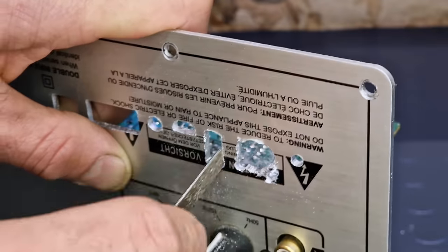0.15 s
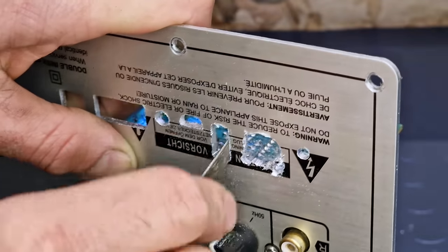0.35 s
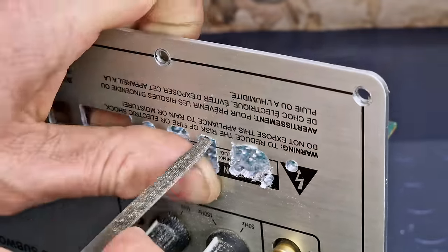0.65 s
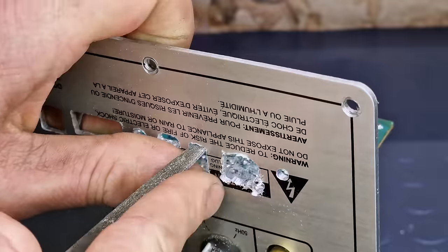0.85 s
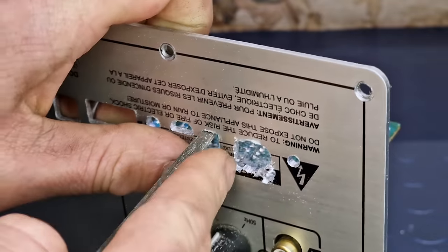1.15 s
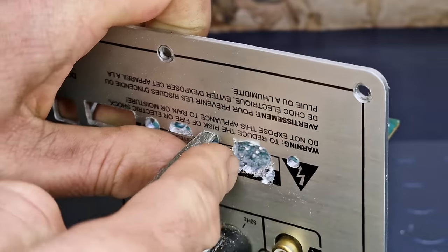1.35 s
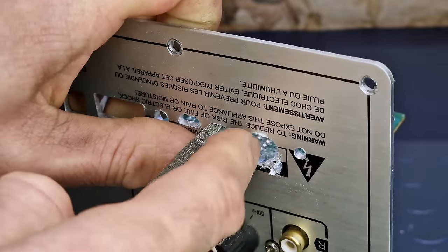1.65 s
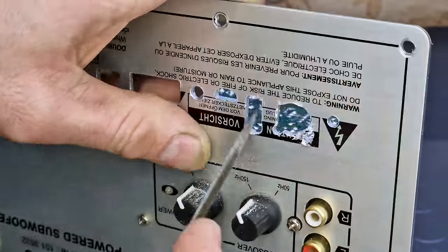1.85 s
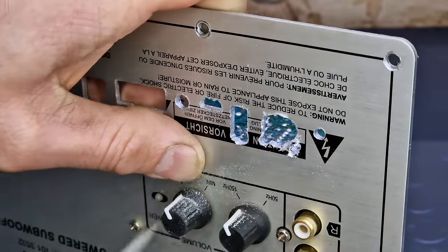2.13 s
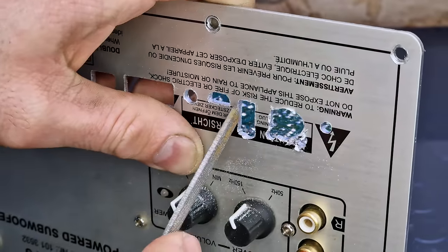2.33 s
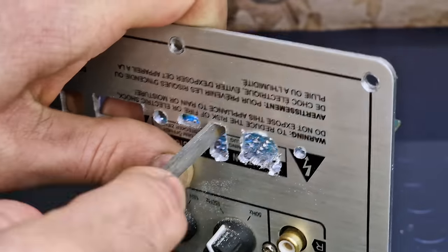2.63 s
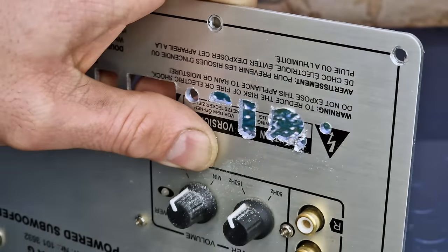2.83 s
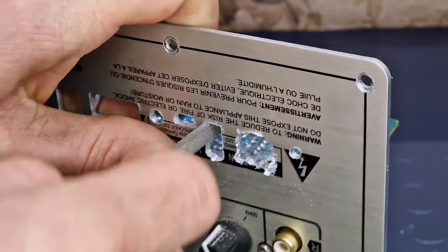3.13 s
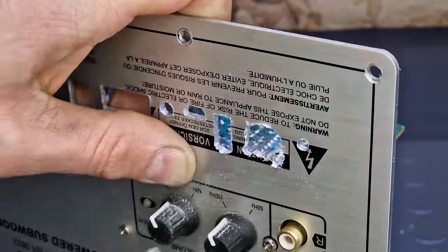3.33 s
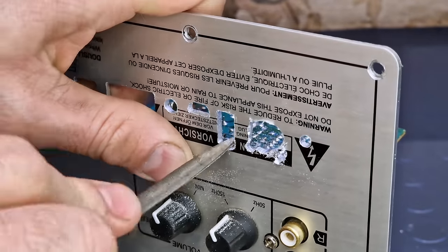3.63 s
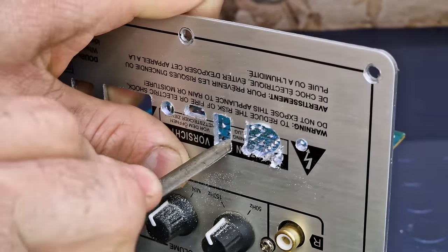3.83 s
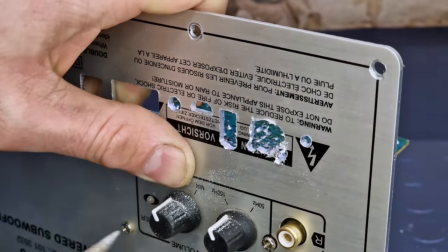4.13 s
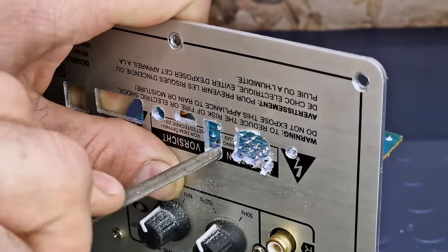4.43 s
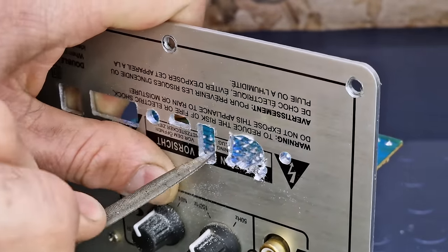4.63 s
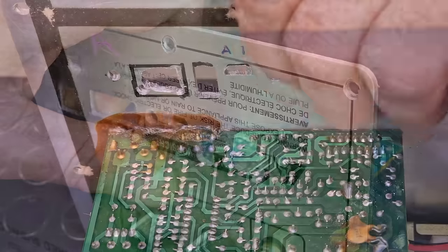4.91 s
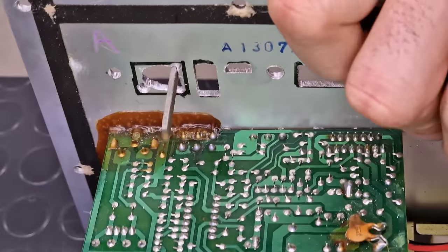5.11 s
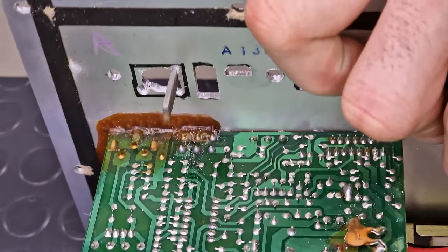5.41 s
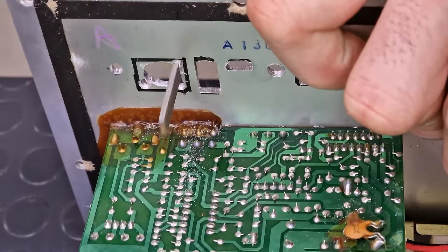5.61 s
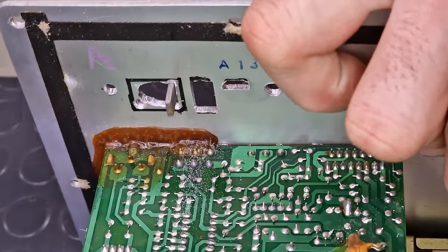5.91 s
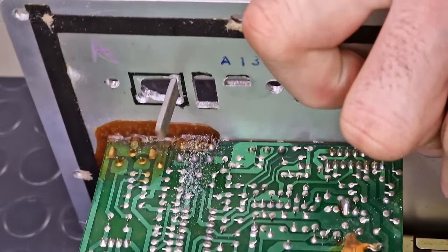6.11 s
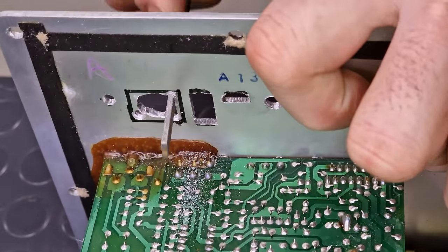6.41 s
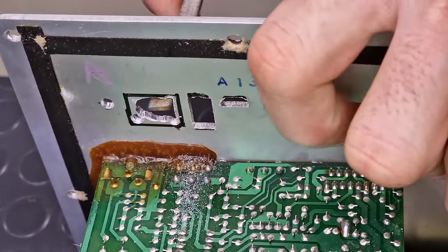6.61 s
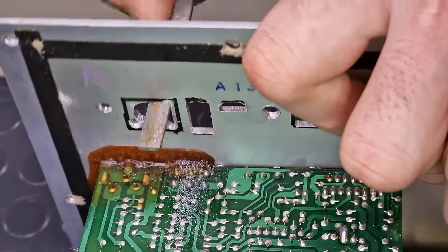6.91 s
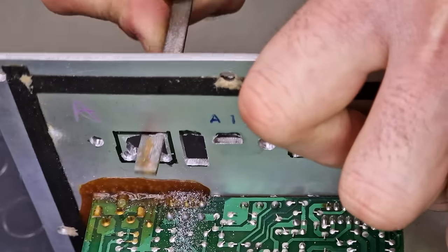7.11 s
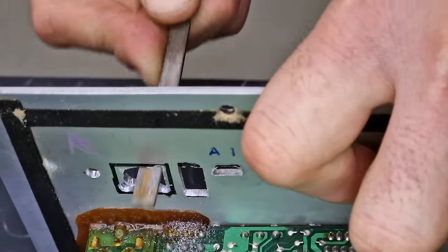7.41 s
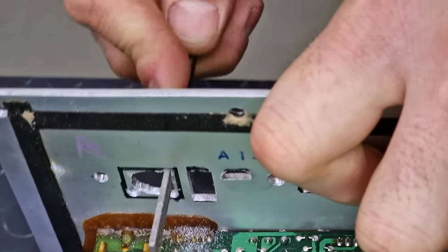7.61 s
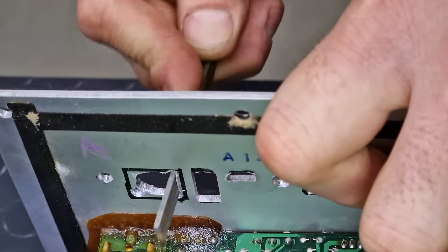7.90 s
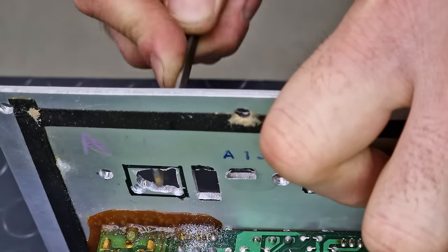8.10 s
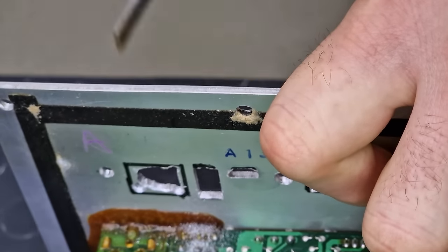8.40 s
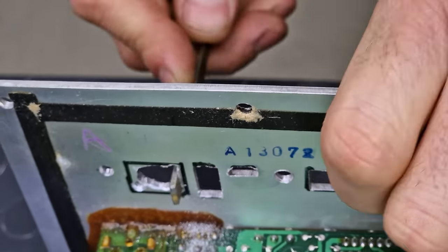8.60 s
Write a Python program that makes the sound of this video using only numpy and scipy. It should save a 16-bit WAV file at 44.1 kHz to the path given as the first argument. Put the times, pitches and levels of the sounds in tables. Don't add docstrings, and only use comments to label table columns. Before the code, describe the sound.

A close, dry stereo sound of a small steel file working a hole in a hand-held aluminium panel. From 0 to 0.45 s very fast strokes make a bright rasping buzz, about fifty per second. From 0.5 to 1.25 s there are separate crisp taps and scratches, then uneven groping strokes until 1.85 s. Tight bursts follow at 1.95-2.2, 2.5-2.85 and 3.05-3.4 s, separated by clicks and light scuffs. Softer rasping runs from 3.7 to 4.2 s, then isolated taps and jolts to 4.9 s. At about 5 s the panel is turned; filing is nearly continuous until 8.45 s, with short breaks, hollow rim knocks and brief damped metallic ringing. Three sharp taps around 8.55 s lead to faint ticks and a closing drag. Quiet workshop hum and a thin fan whine, slightly fainter after the turn, continue throughout.

```python
import sys
import numpy as np
from scipy import signal
from scipy.fft import rfft, irfft, next_fast_len
from scipy.io import wavfile
from scipy.ndimage import uniform_filter1d

SR = 44100
rng = np.random.default_rng(int(sys.argv[2]) if len(sys.argv) > 2 else 0)


def file_out(sig):
    cols = np.atleast_2d(sig).T
    lim = np.clip(cols, -1, 1)
    pcm = np.round(lim * 32767).astype(np.int16)
    wavfile.write(sys.argv[1], SR, pcm)


def elevation(decibels):
    levels = np.asarray(decibels, float)
    return 10 ** (levels / 20)


N = 385875
TIME_S = np.arange(N) / SR

TURN_S = 5.02
FILE_HZ, TEETH_HZ, BURR_HZ, FINEST_HZ = 2250, 4000, 8500, 12600
PULL_DB, SCATTER_DB, SCATTER_S = 2, 1.1, .0007
RIM_FRONT_DB, RIM_BACK_DB = -2.5, -4
RIM_FOLLOWS, BURR_YIELDS = 0.74, 0.14
PANEL_FOLLOWS, USUAL_DB = .85, -33
SPOT_DB, SPOT_S = 1.6, .02
CATCH_S, CATCH_DB = 0.00059, -12.5
SHAKE_DB, SHAKE_HZ = -43, 190
SHIFTING_DB = 1.1
STAYS_ON = 0.17
SWISH_S, SWISH_LENGTH_S, SWISH_DB = 4.975, .035, -59

# frequency [Hz], density [dB per Hz].
HUM = [(30, -10), (200, -8.5), (270, -6.5), (770, -10), (1200, -13), (3300, -15), (6000, -22.5),
       (15100, -20)]
# centre [Hz], width [Hz], level [dB].
WHINE = [(2385, 30, 0), (2600, 200, -8), (2780, 200, -10)]
# frequency [Hz], t60 [s].
SHOP = [(300, 0.27), (12000, 0.024)]
# first [s], last [s], strokes [count], first [dB], last [dB].
RUNS_FRONT = [(0.031, 0.113, 6, -34, -31), (0.128, 0.384, 18, -35, -30), (0.401, 0.441, 3, -33, -33),
              (1.952, 2.014, 4, -41, -32), (2.033, 2.106, 5, -32, -27), (2.122, 2.195, 5, -33, -24),
              (2.494, 2.755, 15, -31, -29), (2.773, 2.854, 7, -32, -30), (3.048, 3.136, 6, -31, -29),
              (3.151, 3.225, 7, -33, -29), (3.237, 3.317, 7, -31, -32), (3.334, 3.386, 4, -33, -30),
              (3.685, 3.75, 5, -40, -37), (3.781, 3.841, 5, -36, -40), (3.868, 3.92, 4, -35, -40),
              (3.936, 4.033, 8, -39, -32), (4.048, 4.162, 10, -32, -38)]
# first [s], last [s], strokes [count], first [dB], last [dB].
RUNS_BACK = [(5.084, 5.208, 7, -41, -27), (5.228, 5.32, 6, -30, -34), (5.332, 5.553, 16, -29, -29),
             (5.565, 5.693, 10, -27, -33), (5.713, 5.833, 8, -38, -36), (5.848, 5.948, 8, -33, -38),
             (5.976, 6.033, 4, -39, -32), (6.05, 6.244, 14, -30, -30), (6.26, 6.359, 7, -31, -32),
             (6.379, 6.45, 5, -38, -37), (6.469, 6.513, 3, -42, -36), (6.567, 6.635, 5, -35, -36),
             (6.723, 6.778, 4, -36, -27), (6.796, 6.891, 7, -28, -30), (6.913, 7.006, 7, -33, -33),
             (7.058, 7.211, 10, -32, -28), (7.222, 7.319, 6, -33, -33), (7.463, 7.512, 4, -43, -33),
             (7.613, 7.689, 6, -36, -33), (7.713, 7.762, 4, -36, -32), (7.789, 7.998, 15, -34, -36),
             (8.013, 8.079, 6, -36, -31), (8.194, 8.306, 9, -35, -32), (8.323, 8.454, 11, -33, -31)]
LEAN_FRONT = [-0.5, 2, -1, 5.5, 7, 2, 4.5, 3.5, 5, 3, 5.5, -1.5, 0, -4, -4, -4, -5]
LEAN_BACK = [2, 1, -3.5, 0, -1.5, 1.5, -1.5, -4.5, 1, -3.5, 5.5, -4, -1.5, 0, -0.5, -1.5, -0.5, 2, 3.5, 5,
             5, 6.5, 5, 9]
BITE_FRONT = [0, 0, 0, 0, 0, 0, 0, 0, 0, 0, 0, 0, 0, 0, 0, 0, 0]
BITE_BACK = [0, 0, 0, 0, 0, 0, 0, 0, 0, 0, 0, 0, 0, 0, 0, 0, 0, 0, 0, 0, 0, 0, -1, -1]
# peak [s], hiss [dB].
STROKES = [(.004, -33), (.741, -52), (.763, -34.5), (0.788, -46), (1.288, -40), (1.298, -36.5),
           (1.314, -51), (1.329, -37.5), (1.365, -40), (1.4, -39), (1.432, -35.5), (1.459, -42.5),
           (1.476, -52), (1.495, -38.5), (1.553, -39), (1.563, -32), (1.573, -38), (1.586, -38),
           (1.649, -36.5), (1.691, -42), (1.71, -40), (1.737, -36.5), (1.77, -36), (1.79, -37.5),
           (1.829, -32.5), (1.845, -40), (2.273, -35), (2.286, -31.5), (2.334, -47), (2.449, -44.5),
           (2.48, -35.5),
           (3.765, -55), (4.044, -43), (4.15, -34), (4.391, -42), (4.481, -47.5), (4.544, -34.5),
                (4.6, -36), (4.76, -33.5), (4.802, -36.5), (4.929, -37.5), (6.535, -38.5), (7.346, -26),
                (7.774, -40), (7.372, -36.5), (7.535, -30), (8.091, -28.5), (8.741, -41.5)]
# start [s], hiss [dB], t60 [s], weight on the panel [dB].
TAPS = [(0.502, -35, 0.019, -8), (0.5128, -29, 0.14, -5), (0.541, -22, 0.037, -18),
        (0.5714, -31, 0.026, -18), (0.639, -29.5, 0.01, 7), (0.6673, -40, 0.012, 2),
        (0.7365, -35, 0.019, 12), (0.759, -26.5, 0.022, -3), (0.8065, -28, 0.018, 0),
        (0.886, -56, 0.008, 7), (0.9465, -26, 0.014, -11), (1.0271, -21, 0.021, -10),
        (1.085, -21.5, 0.011, -13), (1.1614, -20.5, 0.021, -0.5), (1.2145, -25.5, 0.03, -6),
        (1.529, -28, 0.026, -5), (1.615, -30.5, 0.049, 5), (1.679, -28.5, 0.024, 3),
        (2.2575, -24.5, 0.025, 13), (2.4068, -28.5, 0.0078, -13), (3.4672, -28, 0.013, -8),
        (3.561, -35.5, 0.016, -15), (3.637, -40.5, 0.074, -5), (4.2722, -28.5, 0.003, -7.5),
        (4.3755, -30.5, 0.013, 2.5), (4.467, -30.5, 0.029, -9.5), (4.571, -24.5, 0.0059, 5),
        (4.785, -25.5, 0.0066, 1), (4.842, -35.5, 0.015, 1), (4.8732, -21.5, 0.02, 1)]
# start [s], hiss [dB], t60 [s], weight on the panel [dB].
TAPS_BACK = [
    (7.445, -49.5, 0.083, 5),
    (8.516, -27, 0.0099, -5),
    (8.5502, -25, 0.008, -1),
    (8.584, -27, 0.0095, 1),
]
# start [s], hiss [dB], t60 [s], weight on the panel [dB].
FURTHER_TAPS = [(0.777, -26, .01, -12), (.85, -50, .03, -8), (.905, -57, 0.0059, 9), (0.985, -35, .008, -8),
                (1.015, -53, 0.0051, -3), (1.061, -34, .008, -13), (1.139, -50, 0.0066, 9),
                (1.177, -37, 0.017, -1), (1.93, -51, 0.016, -3), (2.277, -25, 0.0099, 12),
                (2.298, -36.5, 0.085, -8), (2.327, -37, .008, 1), (2.43, -46, .01, -9), (3.458, -44, .01, 4),
                (3.479, -39, .03, -5), (3.486, -43, 0.017, 8), (3.491, -41.5, .06, -3), (3.529, -43, .01, 11),
                (3.574, -49, 0.045, 7), (4.406, -34, .008, -11), (4.624, -31.5, 0.0079, -6),
                (6.644, -37.5, 0.07, -21), (8.573, -53, 0.0091, -4), (8.616, -40.5, 0.054, -9),
                (8.637, -46, 0.034, 13), (8.662, -33.5, 0.028, 3), (8.675, -46, 0.13, 8), (8.701, -44.5, 0.11, 6),
                (8.73, -42, 0.055, 6)]
# start [s], peak [dB].
CATCHES = [(0.762, -13), (1.028, -18), (1.681, -17), (1.772, -13), (1.829, -10), (2.2604, -14),
           (2.2764, -26), (2.283, -14), (2.3326, -36), (2.6035, -14), (2.7157, -15), (2.8392, -8.5),
           (3.7484, -35), (3.7788, -36), (3.99, -29), (4.0175, -18), (4.0438, -13), (4.07, -24),
           (4.0984, -15), (4.147, -13), (4.5446, -32), (4.7591, -13), (4.877, -18), (5.59, -16),
           (6.1065, -14), (7.345, -13), (7.761, -21), (8.086, -5), (8.289, -13), (8.5158, -11.5),
           (8.5507, -15)]
# start [s], length [s], level [dB].
SCUFFS = [
    (0.59, 0.14, -62.5),
    (0.951, 0.056, -56.5),
    (2.262, 0.08, -51),
    (2.333, 0.044, -56),
    (3.46, 0.13, -64),
    (4.275, 0.052, -71),
    (5.06, 0.2, -60),
    (5.028, 0.065, -66),
    (6.665, 0.042, -60),
    (8.646, 0.34, -59.5),
]
# start [s], peak [dB].
HOLE_KNOCKS = [(.7625, -26.5), (.9465, -31), (1.0278, -27), (1.1635, -35), (1.2145, -39), (1.293, -26),
               (1.6815, -31), (1.8295, -35), (2.2615, -24.5), (3.487, -39), (3.4925, -48), (2.285, -31),
               (4.545, -35), (4.76, -40), (4.8765, -42),
               (5.0778, -26), (5.174, -13.5), (5.2155, -13.5), (5.246, -21), (5.2793, -14.5), (5.3412, -14),
          (5.3731, -16), (5.399, -20.5), (5.5642, -30), (5.629, -21), (5.6909, -12.5), (5.7222, -19.5),
          (5.7487, -19.5), (5.7911, -28), (5.8365, -20), (6.0251, -24.5), (6.063, -35), (6.1059, -23.5),
          (6.1299, -16.5), (6.2691, -13.5), (6.3214, -25), (6.3374, -20), (6.3582, -21), (6.398, -29),
          (6.4916, -26), (6.512, -18), (6.7195, -38), (6.7435, -28), (6.8892, -17), (6.9844, -15.5),
          (7.0573, -42), (7.1252, -22), (7.155, -23.5), (7.178, -25), (7.3353, -24), (7.3511, -11),
          (7.5197, -26), (7.5381, -15), (7.615, -16.5), (7.704, -18), (7.76, -23.5), (7.849, -23.5),
          (7.8739, -15.5), (8.0141, -20), (8.048, -22), (8.064, -24), (8.0929, -20), (8.1922, -52),
          (8.2354, -30), (8.2461, -21), (8.2794, -22.5), (8.3094, -22.5), (8.321, -21.5), (8.3473, -21.5),
          (8.3763, -24), (8.3923, -18), (8.4306, -35), (8.515, -30)]
# start [s], peak [dB].
SHOVES = [(1.165, -34), (4.377, -34.5), (4.88, -33), (4.546, -27.5), (4.596, -32), (4.76, -30),
          (5.149, -57), (8.291, -26), (8.319, -51), (8.349, -53)]
# start [s], peak [dB].
BUMPS = [
    (4.545, -68),
    (4.876, -66),
    (5.692, -55),
    (6.3, -66),
    (6.89, -56),
    (8.31, -66),
]
# start [s], frequency [Hz], level [dB].
RINGS = [
    (1.769, 4000, -17.5),
    (1.829, 1790, -22),
    (3.529, 920, -37),
    (6.32, 4000, -28),
]
# time [s], slack on the panel [dB], freedom of the file [dB].
GRIP = [(0.0, -0.5, -5.5), (0.62, -3, -10.5), (0.94, 4, -10.5), (1.56, 5.5, -10), (1.95, 0, 0),
        (2.22, -10.5, -18), (2.28, -8.5, -7), (2.45, -4, -10), (3.0, -7.5, -19.5), (3.44, -2, -10),
        (3.75, 3.5, -15), (4.38, 6.5, -10.5), (4.75, -2.5, -11.5), (5.06, 4.5, -18), (5.2, 8.5, -19),
        (5.62, 2.5, -19.5), (6.4, 4.5, -19), (7.6, 3.5, -17), (8.5, -2.5, -23.5)]
# time [s], share of the hiss [dB].
BURR = [(0, -1.23), (.6, -1.5), (1.2, 0), (1.85, -4.5), (2, -1.98), (3.4, -1.85), (3.7, -0.5), (4.2, -1),
        (5, -2), (5.1, 3.5), (5.6, 1.5), (5.85, 1), (6.15, 0.5), (6.5, 0), (7.2, 0), (7.8, -1), (8.4, -1),
        (8.7, -0.5)]
# time [s], finest hiss [dB].
TILT = [(0, 1), (.9, -1), (1.9, -2), (3.4, 0), (3.7, -7), (4.2, -5), (4.9, 1), (5.2, -4), (5.7, -3),
        (6.2, 0), (6.9, -2), (7.2, 3), (7.7, 0), (8.4, 2), (8.6, -6)]
# centre [Hz], width [Hz], level [dB].
PANEL_FRONT = [(285.7, 25.5, -14.5), (373, 26.6, -13), (435, 27, -13), (493.5, 11, -10.5),
               (538.3, 16.6, -8), (607.5, 23.3, -4), (668, 29, -7), (736.6, 21.6, -1), (854, 29, 1),
               (940.6, 24, -1.5), (973, 67, -7.5), (1059, 44, -5), (1130, 42, -5.5), (1237, 144, -13)]
# centre [Hz], width [Hz], level [dB].
PANEL_BACK = [(298, 27.4, -17), (379, 41, -20.5), (556, 27.6, -10.5), (596, 28.6, -9), (744, 21.5, 0),
              (858, 19, 3.5), (935, 25, -2.5), (961, 25, -6.5), (1084, 85, -4.5), (1142, 37, -1.5)]
# centre [Hz], width [Hz], level [dB].
RIM_FRONT = [(1370, 82, -0.5), (1482, 54, 4.5), (1578, 36, 4), (1694, 93, 0), (1780, 104, 2.5),
             (2028, 290, 0.5), (2182, 99, 2), (2290, 250, -1)]
# centre [Hz], width [Hz], level [dB].
RIM_BACK = [(1386, 74, 8.5), (1514, 31, 8.5), (1565, 120, 2), (1740, 45, 3), (1812, 48, 7.5),
            (1938, 48, 1.5), (2057, 68, 1), (2303, 44, -2), (2372, 43, -4), (2800, 22, -10.5)]
# centre [Hz], width [Hz], level [dB].
STRUCK = [(1409, 24.5, 4.5), (1837, 207, 5), (1950, 280, -1)]
# centre [Hz], width [Hz], level [dB].
ROCK = [(320, 130, 0)]
# frequency [Hz], density [dB per Hz].
HISS_FRONT = [(2200, 11.5), (2700, 14.5), (3400, 0), (4500, 3.5), (4900, 8), (5500, 7), (6000, -1.5),
              (7200, -4), (9500, -4), (10500, 3.5), (12200, 5), (13200, 3), (15500, 0)]
# frequency [Hz], density [dB per Hz].
HISS_BACK = [(2200, -2.5), (3000, -4.5), (4200, -0.5), (5450, 11), (6200, 5.5), (6700, 4.5), (8300, -11.5),
             (9600, -4), (11100, 0), (12150, 1), (12700, -3), (13400, -8), (14300, 0), (15500, -8.5)]
# frequency [Hz], lead [radians].
LEAD_FRONT = [(2500, 0.06), (6400, 0.76), (8600, 0.66), (13000, 1.76)]
# frequency [Hz], lead [radians].
LEAD_BACK = [(1500, -0.69), (6000, -0.15), (12000, -1.76), (15000, -2.1)]
# frequency [Hz], likeness [0 to 1].
ALIKE = [(80, .5), (250, .96), (600, .999), (1200, .996), (2000, .94), (5000, .81), (12000, .72)]


def unit(x):
    return x / np.sqrt(np.mean(np.abs(x) ** 2) + 1e-20)


def gaussian(*shape):
    return rng.standard_normal(shape)


def along(points, hz):
    f, v = np.transpose(points)
    return np.interp(np.log(hz + 1), np.log(f + 1), v)


def over_time(points, column=1):
    table = np.transpose(points)
    return np.interp(TIME_S, table[0], table[column])


def filtered(x, response):
    size = next_fast_len(N + SR // 8, True)
    return irfft(rfft(x, size) * response(np.fft.rfftfreq(size, 1 / SR)), size)[..., :N]


def modes(table):
    def response(f):
        total = 0
        for k, (centre, width, db) in enumerate(table):
            loss = 1j * f * width
            total = total + (-1) ** k * elevation(db) * loss / (centre * centre - f * f + loss)
        return unit(total)
    return response


def above(f, hz):
    return 1 - 1 / (1 + (f / hz) ** 16)


def behind():
    return (np.arange(N) > TURN_S * SR) * 1.


def patches(shape):
    return unit(uniform_filter1d(uniform_filter1d(gaussian(*shape), size=2, axis=0), size=4, axis=1))


def ports(pair, lead, alike):
    def mix(f):
        angle = np.arccos(np.clip(along(alike, f), 0, 1)) / 2
        return np.array([np.cos(angle), np.sin(angle)])
    mid, side = filtered(pair, mix)
    left_right = np.array([mid + side, mid - side])
    return filtered(left_right, lambda f: np.exp([[.5j], [-.5j]] * along(lead, f)))


def hum():
    noise = unit(filtered(gaussian(2, N), lambda f: elevation(along(HUM, f))))
    wobble_db = 2.1 * unit(uniform_filter1d(gaussian(N), size=1500))
    whine = elevation(-3.0 - 10 * behind() + wobble_db) * filtered(gaussian(2, N), modes(WHINE))
    drift_db = 0.56 * unit(uniform_filter1d(gaussian(N), size=3000))
    room = elevation(-64.0 - 2.6 * behind() + drift_db) * ports(noise + whine, LEAD_BACK, [(100, 0.49)])
    swell = np.exp(-((TIME_S - SWISH_S) / SWISH_LENGTH_S) ** 2)
    slide = swell * filtered(gaussian(N), modes([(2820, 390, 0)]))
    return room + elevation(SWISH_DB) * slide


def strokes():
    rows = []
    runs = zip(RUNS_FRONT + RUNS_BACK, BITE_FRONT + BITE_BACK, LEAN_FRONT + LEAN_BACK)
    for (first, last, count, first_db, last_db), bite_db, lean_db in runs:
        push_pull_db = PULL_DB * (.5 - np.arange(count) % 2)
        hiss_db = np.linspace(first_db, last_db, count) + bite_db + push_pull_db
        rows.append((np.linspace(first, last, count), hiss_db, np.full(count, lean_db - bite_db)))
    even = np.hstack(rows).T
    even[:, :2] += gaussian(len(even), 2) * [SCATTER_S, SCATTER_DB]
    single = np.pad(STROKES, ((0, 0), (0, 1)))
    every = np.vstack([even, single])
    return every[np.argsort(every[:, 0])]


def stroke_power():
    power, t = np.zeros((2, N + SR)), np.arange(SR // 10) / SR
    from_peak = t - t[-1] / 2
    light = elevation(-23.2 - 114 * np.maximum(from_peak / 0.087, -from_peak / 0.058))
    passes = strokes()
    gaps = np.diff(passes[:, 0], prepend=0, append=N / SR)
    lengths = np.clip(0.27 * np.minimum(gaps[1:], gaps[:-1]), .002, .0046)
    for (s, db, lean_db), length in zip(passes, lengths):
        swell = np.exp(-np.abs(from_peak / length) ** 4.2) + light
        gain = elevation([[2 * (db + 0.088)], [2 * (db + lean_db - 0.5)]])
        power[:, round(s * SR):][:, :len(t)] += gain * swell
    return power[:, len(t) // 2:][:, :N]


def tap_power():
    power, t = np.zeros((2, N + SR)), np.arange(SR // 10) / SR
    for s, db, t60, lean_db in TAPS + TAPS_BACK + FURTHER_TAPS:
        decay = elevation(2.4 - 120 * t / 0.0019) + elevation(-120 * t / t60) + elevation(-46.4 - 120 * t / 0.087)
        gain = elevation([[2 * (db - 0.5)], [2 * (db + lean_db + 0.5)]])
        power[:, round(s * SR):][:, :len(t)] += gain * (1 - np.exp(-t / 0.00084)) * decay
    return power[:, :N]


def drag():
    uneven = elevation(3.5 * unit(uniform_filter1d(gaussian(N), size=200)))
    force = np.zeros(N)
    for s, length, db in SCUFFS:
        fade = 2 * (s + length - TIME_S) / length
        force += elevation(db) * np.clip(np.minimum((TIME_S - s) / 0.0035, fade), 0, 1)
    return uneven * force


def catch_power():
    power, t = np.zeros((2, N + SR)), np.arange(SR // 10) / SR
    from_peak = t - t[-1] / 2 - CATCH_S
    for s, db in CATCHES:
        spike = np.exp(-(from_peak / CATCH_S) ** 2)
        power[0, round(s * SR):][:len(t)] += elevation(2 * (db + CATCH_DB)) * spike
    return power[:, len(t) // 2:][:, :N]


def pressure():
    return np.sqrt(stroke_power() + tap_power() + catch_power())


def grit(patchy_db):
    z = signal.stft(gaussian(2, N), nperseg=256)[2]
    gain = elevation(patchy_db * patches(z.shape[1:]))
    even_gain = gain / np.sqrt(np.mean(gain ** 2, axis=0))
    stream = signal.istft(z * even_gain, nperseg=256)[1][:, :N]
    harder_db = 2.25 * unit(uniform_filter1d(gaussian(N), size=20))
    return unit(stream * elevation(harder_db))


def favoured(x, patchy_db):
    z = signal.stft(x, nperseg=1024)[2]
    low = z[:, :80]
    low *= unit(elevation(patchy_db * patches(low.shape[1:])))
    return signal.istft(z, nperseg=1024)[1][:, :N]


def spots(count):
    knots = gaussian(count, int(N / SR / SPOT_S) + 2)
    return [unit(elevation(SPOT_DB * np.interp(TIME_S / SPOT_S, np.arange(len(k)), k))) for k in knots]


def blows(events, gain_db):
    push, shape = np.zeros((2, N)), np.hanning(14)
    for (s, db, *_), chance in zip(events, rng.random(len(events))):
        bounce_s = s + .002 * (1 + chance)
        push[0, round(s * SR):][:len(shape)] += 0
        push[0, round(s * SR):][:len(shape)] = elevation(db + gain_db) * shape
        push[0, round(bounce_s * SR):][:len(shape)] = elevation(db + gain_db - 9.0) * shape
    return push


def thuds(knocks):
    push = elevation(-35.5) * knocks + blows(TAPS + TAPS_BACK, gain_db=-23.5) + blows(SHOVES, gain_db=3)
    return filtered(push, lambda f: modes(ROCK)(f) * (f / (f - 200j)) ** 4)


def bench(shaking):
    push = elevation(SHAKE_DB) * shaking + blows(BUMPS, gain_db=23)
    level = np.sqrt(SR / SHAKE_HZ / 20)
    return filtered(push, lambda f: level / (1 + 1j * f / SHAKE_HZ) ** 2)


def rings():
    out, t = np.zeros((2, N)), np.arange(SR // 20) / SR
    for s, hz, db in RINGS:
        envelope = elevation(db - 60 * t / 0.035) * (1 - np.exp(-t / 0.00032))
        out[0, round(s * SR):][:len(t)] += envelope * np.sin(2 * np.pi * hz * t)
    return out


def hiss_band(colour, low_hz, high_hz):
    def response(f):
        share = above(f, low_hz) * (1 - above(f, high_hz))
        return unit(elevation(along(colour, f)) * np.sqrt(share))
    return response


def filing():
    back = behind()
    panel_db, file_db = over_time(GRIP, 1), over_time(GRIP, 2)
    rim_db = np.where(back, RIM_BACK_DB, RIM_FRONT_DB) + RIM_FOLLOWS * panel_db
    burr_db = over_time(BURR) - BURR_YIELDS * panel_db
    teeth = np.sqrt(np.clip(1 - elevation(2 * burr_db), .03, 1))
    (force, weight), rub = pressure(), drag()
    noise, knocks = grit(patchy_db=2.0), blows(HOLE_KNOCKS, gain_db=2.5)

    lasting = np.sqrt(np.abs(uniform_filter1d(weight ** 2, size=500, origin=240)))
    load = np.hypot(1.102 * weight, 0.34 * lasting)
    swing = elevation(USUAL_DB) * (load / elevation(USUAL_DB)) ** PANEL_FOLLOWS
    heavy = np.hypot(swing, elevation(12) * rub) * favoured(noise, SHIFTING_DB)
    grazing = STAYS_ON ** 2 * back * np.abs(uniform_filter1d(force ** 2, size=600))
    push = np.sqrt(force ** 2 + rub ** 2 + grazing) * noise
    smooth = np.sqrt(np.abs(uniform_filter1d(force ** 2 + rub ** 2, size=260, origin=120))) * noise

    on_rim, on_panel, on_file, on_teeth, on_burr = spots(count=5)
    out = rings() + thuds(knocks) + bench(lasting * noise)
    out += filtered(back * elevation(-2.5) * knocks, modes(STRUCK))
    panel_drive = heavy * on_panel * elevation(panel_db - 5.0) + elevation(-10.0) * knocks
    rim_drive = heavy * on_rim * elevation(rim_db - 5.5) + elevation(-3.5 * back) * knocks
    faces = ((1 - back, HISS_FRONT, PANEL_FRONT, RIM_FRONT), (back, HISS_BACK, PANEL_BACK, RIM_BACK))
    for side, colour, panel, rim in faces:
        out += filtered(side * panel_drive, modes(panel))
        out += filtered(side * rim_drive, modes(rim))
        out += filtered(side * smooth * on_file * elevation(file_db), hiss_band(colour, FILE_HZ, TEETH_HZ))
        out += filtered(side * push * on_teeth * teeth, hiss_band(colour, TEETH_HZ, BURR_HZ))
        out += filtered(side * push * on_burr * elevation(burr_db), hiss_band(colour, BURR_HZ, SR))
    turned = elevation(over_time(TILT)) - 1
    return out + turned * filtered(out, lambda f: above(f, FINEST_HZ) ** 2)


def shop(x):
    hz, t, z = signal.stft(gaussian(2, SR // 4), SR, nperseg=128)
    decay = elevation(-60 * t / along(SHOP, hz)[:, None])
    tail = signal.istft(z * decay, SR, nperseg=128)[1]
    return signal.fftconvolve(x[None], tail / np.linalg.norm(tail[0]), axes=1)[:, :N]


def scene():
    work, back = filing(), behind()
    front = ports(work * (1 - back), LEAD_FRONT, ALIKE) * elevation([[.85], [-.85]])
    rear = ports(work * back, LEAD_BACK, ALIKE) * elevation([[-.45], [.45]])
    return front + rear + elevation(-27) * shop(work[0]) + hum()


def top_cut(x):
    return signal.sosfilt(signal.butter(12, 16540, fs=SR, output="sos"), x)


def record(dry):
    rounded = dry / (1 + np.abs(dry / .28) ** 4) ** (1 / 4)

    def top_drop(f):
        first_db = 22 * np.clip((f - 15500) / 400, 0, 1)
        step_db = 9 * np.clip((f - 15850) / 60, 0, 1)
        last_db = 11 * np.clip((f - 15900) / 600, 0, 2)
        return elevation(-first_db - step_db - last_db)
    return top_cut(filtered(rounded, top_drop))


dry = scene()
out = record(dry)
file_out(out)
```